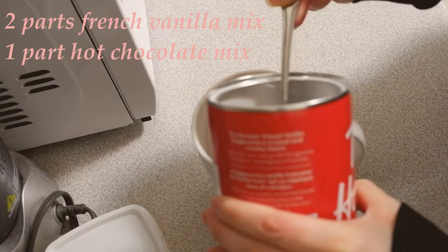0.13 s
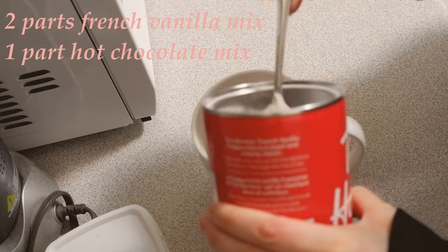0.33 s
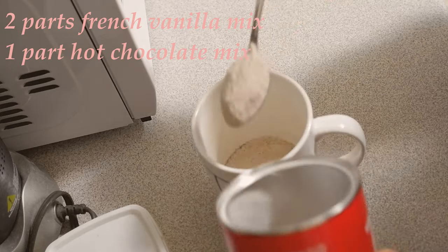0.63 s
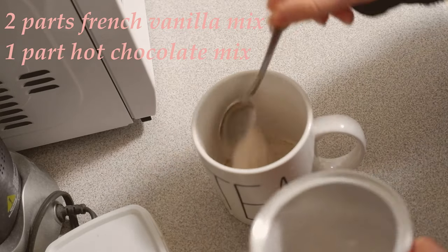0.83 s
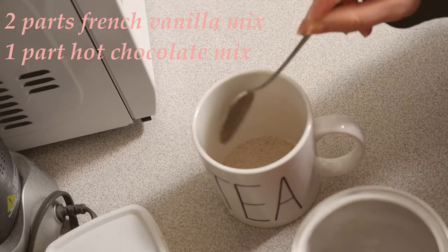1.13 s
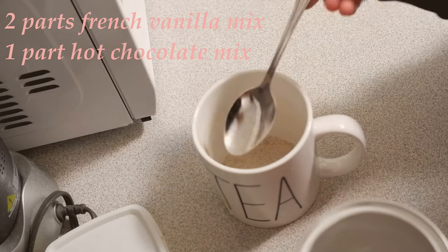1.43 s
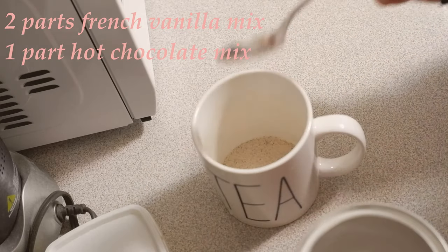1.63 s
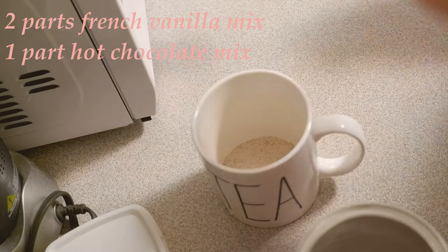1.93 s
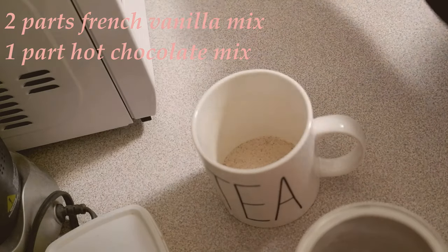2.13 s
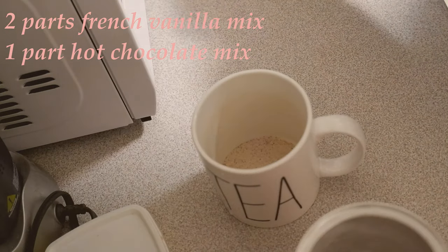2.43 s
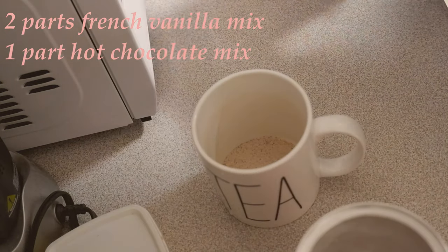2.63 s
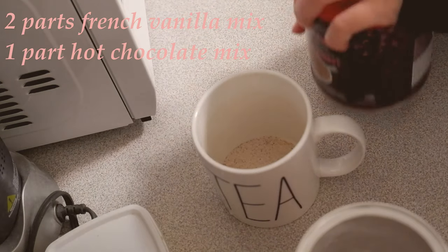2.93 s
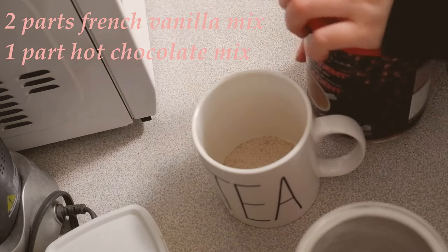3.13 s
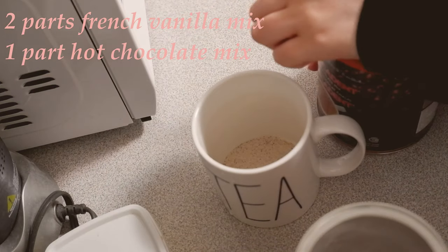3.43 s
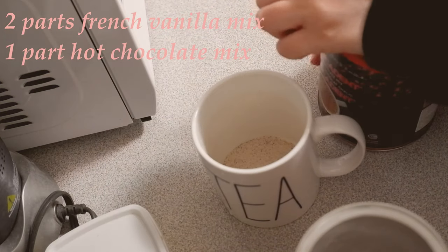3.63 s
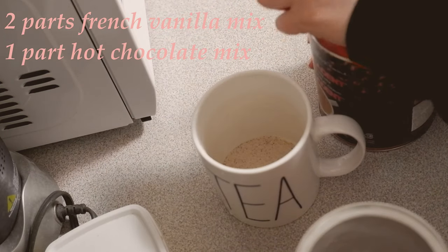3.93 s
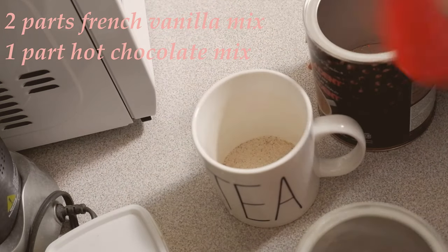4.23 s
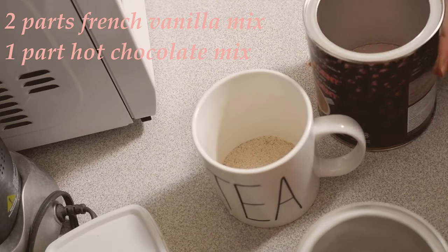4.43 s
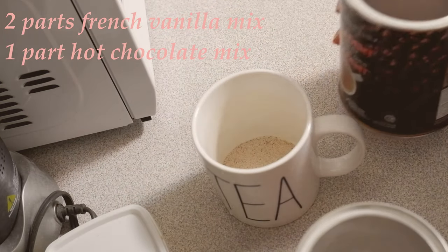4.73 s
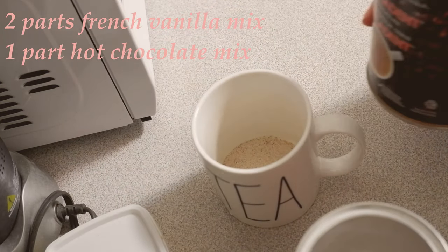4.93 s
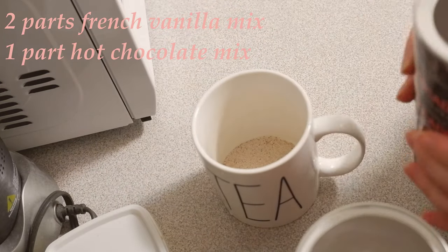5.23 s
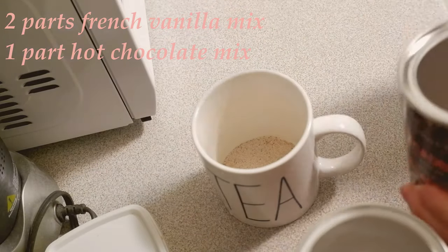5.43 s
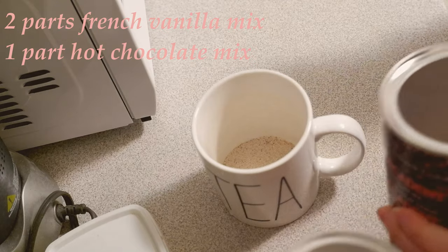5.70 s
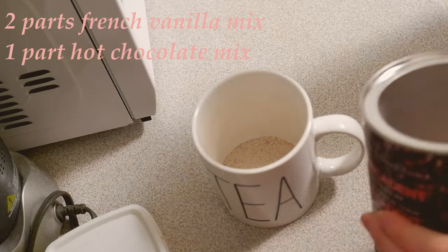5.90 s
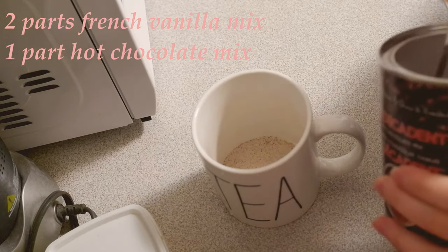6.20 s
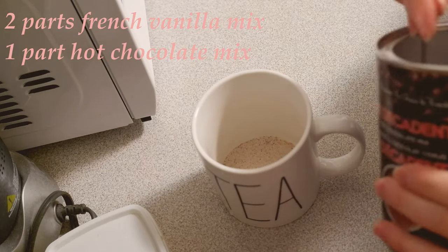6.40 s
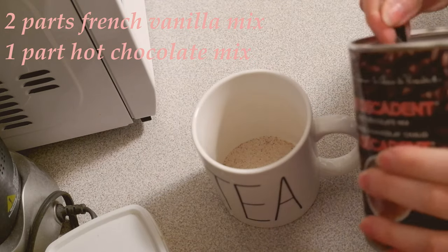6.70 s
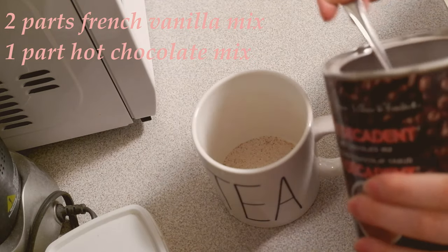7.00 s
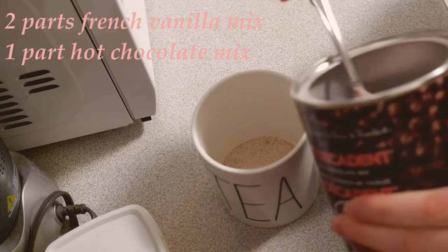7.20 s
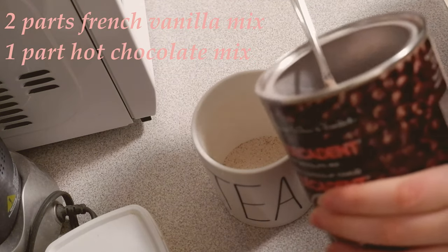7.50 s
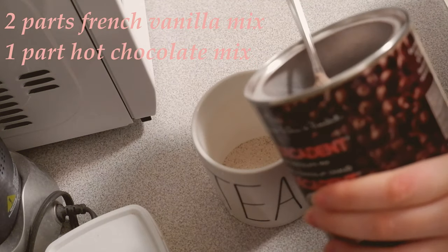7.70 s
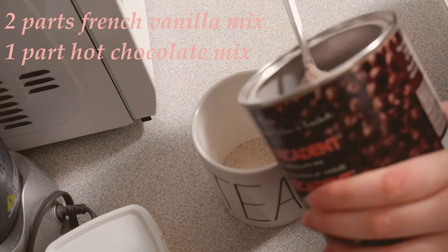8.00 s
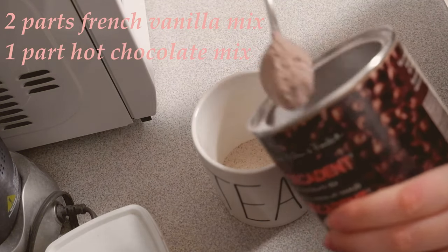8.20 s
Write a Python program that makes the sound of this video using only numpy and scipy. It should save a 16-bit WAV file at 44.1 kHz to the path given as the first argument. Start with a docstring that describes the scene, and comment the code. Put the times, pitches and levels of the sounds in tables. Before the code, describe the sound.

Over a low appliance hum, tins knock onto a kitchen counter, a plastic lid pops off hollowly, then a metal spoon digs crunchily through powder.

```python
"""A metal spoon digs through drink powder in a tin and knocks on its wall, at a kitchen counter.
Before that one tin is set down, and a second is fetched; its lid comes off with a hollow pop and is laid aside.
The tin squeaks and is dragged closer. An appliance hums throughout. Knocks are short bursts that ring a set
of modes, rubbing is a stream of tiny slips, the pop is a rising tone of air, and the hum is tones over noise.
A noise-built room answers every sound on the counter."""
import sys
import numpy as np
from scipy import signal
from scipy.fft import rfft, irfft, next_fast_len
from scipy.io import wavfile
from scipy.ndimage import uniform_filter1d, map_coordinates

SR = 44100
rng = np.random.default_rng(int(sys.argv[2]) if len(sys.argv) > 2 else 0)


def wav_out(sig):
    """Save sig, one row per channel (or a flat mono array), as 16-bit PCM at SR to the path in sys.argv[1]."""
    wavfile.write(sys.argv[1], SR, np.round(np.clip(np.atleast_2d(sig).T, -1, 1) * 32767).astype(np.int16))


N = 368235
TIME = np.arange(N) / SR


def undb(db):
    """Turn decibels into gain."""
    return 10 ** (np.asarray(db) / 20)


def unit(x):
    """Scale to an average (rms) level of 1."""
    return x / np.sqrt(np.mean(x ** 2))


def colour(x, points):
    """Raise or lower each pitch of a sound, following a curve of (pitch_hz, level_db) points."""
    hz, db = np.transpose(points)
    size = next_fast_len(len(x))
    bins_hz = np.maximum(np.arange(size // 2 + 1) * SR / size, 1)
    gain = undb(np.interp(np.log(bins_hz), np.log(hz), db))
    return irfft(rfft(x, size) * gain, size)[:len(x)]


def band(x, low_hz, high_hz):
    """Keep only the pitches between two limits."""
    edges_hz = [low_hz, min(high_hz, .48 * SR)]
    return signal.sosfilt(signal.butter(3, edges_hz, "band", fs=SR, output="sos"), x)


def add(track, s, sound):
    """Mix a sound into a track at time s, in seconds."""
    i = int(s * SR)
    track[i:i + len(sound)] += sound[:N - i]


def fade(t, t60):
    """Die away smoothly, falling 60 dB in t60 seconds."""
    return np.exp(-np.log(1000) * t / t60)


# How far left and right differ. Columns: pitch_hz, side_against_mid_db
STEREO_WIDTH = [(60, -4), (250, -20), (500, -12.5), (1000, -6), (2000, -2.5), (4000, -0.5), (8000, 1.5)]


def spread(mid, side):
    """Make left and right: more alike in the bass, less alike in the treble."""
    side = colour(side, STEREO_WIDTH)
    return np.array([mid + side, mid - side])


# Noise of moving air. Columns: pitch_hz, level_db
RUMBLE_COLOUR = [(20, -11), (40, -8.5), (85, -6), (140, 0), (170, 4), (208, -3), (232, 13), (255, 5),
                 (290, -5.5), (330, -3.5), (370, -8.5), (430, -6), (520, -10.5), (680, -14.5), (800, -20.5),
                 (1030, -16.5), (1600, -27), (2200, -28.5), (3200, -36), (4200, -41.5), (6500, -48.5),
                 (10500, -51), (13000, -61), (15500, -72)]
# Steady tones of motor and mains. Columns: pitch_hz, level_db (rms)
HUM_TONES = [(58.7, -41), (120, -43)]
# Brief drops of the background, before they are smoothed. Columns: start_s, level_db
BACKGROUND_DIPS = [(3.79, -0.5), (4.152, -7), (4.31, -3), (4.61, -9.5)]


def appliance():
    """Motor and mains tones hum under the rumble of moving air; the level dips briefly at the listed moments."""
    mid, side = (unit(colour(rng.standard_normal(N), RUMBLE_COLOUR)) for _ in range(2))
    rumble = undb(-39.5) * spread(mid, side)
    hum = sum(undb(db) * np.sqrt(2) * np.sin(2 * np.pi * (hz * TIME + rng.random()))
              for hz, db in HUM_TONES)
    recovery_s = 0.094
    dips_db = sum(db * (TIME > s) * np.exp(-np.abs(TIME - s) / recovery_s) for s, db in BACKGROUND_DIPS)
    return (hum + rumble) * undb(uniform_filter1d(dips_db, size=SR // 50))


# How long the room rings. Columns: pitch_hz, t60_s (time to fall 60 dB)
ROOM_FADE = [(150, 0.45), (600, 0.25), (2000, 0.32), (6000, 0.22), (14000, 0.55)]


def room_tail(build_s, near_gain, near_t60):
    """Dense early reflections off counter and cupboards, then the room's decay, octave by octave."""
    t = TIME[:SR // 2]
    hz, t60 = np.transpose(ROOM_FADE)
    tail = 0
    for low_hz in 88 * 2. ** np.arange(8):
        noise = band(rng.standard_normal(len(t)), low_hz, 2 * low_hz)
        tail = tail + noise * fade(t, np.interp(low_hz * np.sqrt(2), hz, t60))
    tail = tail * np.minimum(t / build_s, 1) * (1 + near_gain * fade(t, near_t60))
    return tail / np.sqrt(np.sum(tail ** 2))


def kitchen(x, walls, wet_db, pan_db):
    """Direct sound (pan: left minus right), one slap off the wall behind the counter, and the room's answer."""
    slap_s, slap_db = .0066, -14  # the level is against the room's answer
    slap = undb(slap_db + wet_db) * np.interp(TIME - slap_s, TIME, x, left=0)
    direct = (x + slap) * undb(np.array([[pan_db], [-pan_db]]) / 2)
    answer = signal.fftconvolve(x[None], walls, axes=1)[:, :N]
    return direct + undb(wet_db) * answer


def ring(modes, scatter_db, detune):
    """A body rings in close pairs of tones, each pair shifted, split and weighted at random for every blow."""
    t, out = TIME[:SR // 6], 0
    for hz, db, t60 in modes:
        size, shift, split = rng.standard_normal(3)
        pair = sum(np.sin(2 * np.pi * hz * (1 + detune * (shift / 2 + way * split)) * t)
                   for way in (-1, 1)) / 2
        out = out + undb(db + scatter_db * size) * pair * fade(t, t60)
    return out


# Pitch bands in which each blow is balanced. Columns: low_hz, high_hz
BLOW_BANDS = [(70, 300), (300, 700), (700, 1400), (1400, 4500), (4500, 14000)]


def blows(rows, modes, voice, crack_colour, detune, crack_db, crack_t60, gain_db):
    """Each blow pushes, cracks and rings a body; hard contact is brighter, firm contact thumps more."""
    out, t = np.zeros(N), TIME[:SR // 6]
    pivot_hz = 1000  # hardness tilts the sound around this pitch
    octaves = np.log2(np.array(BLOW_BANDS[1:]) / pivot_hz).mean(axis=1)
    voice_hz, voice_db = np.transpose(voice)
    radiated_db = np.interp(octaves, np.log2(voice_hz / pivot_hz), voice_db)
    push = undb(10.5) * fade(t, 0.00068)  # a single pressure pulse
    for s, level_db, hardness, thump_db in rows:
        crack = colour(rng.standard_normal(len(t)), crack_colour) * fade(t, crack_t60)
        hit = ring(modes, scatter_db=2.5, detune=detune) + undb(crack_db) * crack + push
        parts = [band(hit, low, high) for low, high in BLOW_BANDS]
        gains = undb(level_db + np.append(thump_db, radiated_db + hardness * octaves))
        # each band is first evened out over its opening 25 ms
        add(out, s, sum(g * p / np.std(p[:SR // 40]) for g, p in zip(gains, parts)))
    return out * undb(gain_db)


def friction(slips_per_s, scatter_db, hiss, catch_db):
    """Tiny slips of uneven size over the hiss of the smoothest ones; the contact catches and lets go by turns."""
    is_slip = rng.random(N) < slips_per_s / SR
    sizes = undb(scatter_db * np.minimum(rng.exponential(size=N), 4))
    slips = is_slip * rng.choice([-1, 1], N) * sizes
    catch_times = TIME[::SR // 90]
    catches = np.interp(TIME, catch_times, rng.standard_normal(len(catch_times)))
    return (unit(slips) + hiss * rng.standard_normal(N)) * undb(catch_db * np.clip(catches, -2, 2))


def strokes(rows, peak_share, swell):
    """Each stroke presses harder up to a share of its length, then eases off; higher swell is more pointed."""
    out, share = np.zeros(N), np.clip(peak_share, .05, .95)
    for s, length, db in rows:
        progress = TIME[:int(length * SR)] / length
        add(out, s, undb(db) * np.interp(progress, [0, share, 1], [0, 1, 0]) ** swell)
    return out


def pressed(x, modes, damping_hz, floor_db):
    """A body rubbed under pressure: its ringing tones widen into resonances."""
    hz = np.geomspace(100, 16000, 600)
    power = 0
    for mode_hz, db, t60 in modes:
        half_width_hz = damping_hz / 2 + np.log(1000) / (2 * np.pi * t60)
        power = power + undb(db) ** 2 / (1 + ((hz - mode_hz) / half_width_hz) ** 2)
    response_db = 10 * np.log10(power + undb(floor_db) ** 2)
    return unit(colour(x, np.transpose([hz, response_db])))


def wander(x, drift, moves_per_s):
    """The point of contact travels, so the resonances slide a little up and down."""
    knots = np.arange(0, TIME[-1] + 1, 1 / moves_per_s)
    speed = drift * np.interp(TIME, knots, rng.uniform(-0.993, 1, len(knots)))
    return map_coordinates(x, [np.cumsum(1 + speed - speed.mean())], mode="mirror")


# Fingers on the tin. Columns: start_s, length_s, level_db (before a shared trim)
HAND_STROKES = [(0, 0.1, -65), (1.55, 1.75, -66), (1.7, 0.11, -69.5), (2.22, 0.032, -66),
                (2.315, 0.056, -63), (2.41, 0.044, -63), (2.635, 0.068, -68), (2.72, 0.13, -68),
                (3.17, 0.087, -54), (3.29, 0.27, -61), (5.17, 0.16, -54), (5.365, 0.094, -49),
                (5.64, 0.31, -54.5)]
# Sound of skin on the tin. Columns: pitch_hz, level_db
HAND_TONE = [(400, -11), (1500, 9), (3000, 4), (5000, -1.5), (8000, -6.5), (12000, -7), (15000, -11)]


def hand_rub():
    """Fingers brush the tin: uneven slips and hiss, shaped into a soft treble rustle."""
    rub = unit(colour(friction(900, scatter_db=3.0, hiss=0.8, catch_db=4.0), HAND_TONE))
    return rub * strokes(HAND_STROKES, peak_share=0.51, swell=0.37)


# The first tin touching down. Columns: start_s, level_db, hardness_db_per_octave, thump_db;
# levels are before the function's gain
FIRST_TIN_BLOWS = [(1.1465, -18.5, 0, -4), (1.3665, -26, -0.5, -3.5), (1.535, -35.5, -2.5, 1.5),
                   (1.551, -37.5, -5.5, 10)]
# Tones the first tin rings with. Columns: pitch_hz, level_db, t60_s
FIRST_TIN_RING = [(101, 4, 0.035), (246, -1.5, 0.058), (400, -8.5, 0.14), (520, -1, 0.025), (641, 5, 0.026),
                  (770, -3.5, 0.027), (931, -6.5, 0.03), (1062, -5.5, 0.039), (1300, -7.5, 0.027),
                  (1390, -8.5, 0.027), (1700, -10, 0.03), (1965, -8.5, .035), (2280, -15, 0.035),
                  (3800, -16, .022)]
# How the first tin sends out a middling blow. Columns: pitch_hz, level_db
FIRST_TIN_OUTPUT = [(460, 2.5), (1000, -0.5), (2500, -16), (7900, -39.5)]
# Crack of contact, for both tins. Columns: pitch_hz, level_db
TIN_CONTACT = [(500, 7), (1400, 5), (1750, -2), (2400, -1), (3000, -10), (4000, -11), (5500, -19),
               (9000, -21), (14000, -31)]


def first_tin_knocks():
    """The first tin knocks as it is set down: contact cracks make its body ring."""
    return blows(FIRST_TIN_BLOWS, FIRST_TIN_RING, FIRST_TIN_OUTPUT, TIN_CONTACT,
                 detune=.022, crack_db=11, crack_t60=0.018, gain_db=-5.5)


# Knocks of the second tin. Columns: start_s, level_db, hardness_db_per_octave, thump_db;
# levels are before the function's gain
SECOND_TIN_BLOWS = [(2.867, -48, 3, -13), (2.896, -44, 1, -13), (3.541, -18.5, 2.5, -25),
                    (3.5443, -18, -1, -7), (5.659, -43, -7, 6), (5.797, -40, -4, 5), (5.831, -33.5, 1, -1),
                    (5.852, -28, 0, -3), (5.882, -34.5, -1, -3), (5.897, -40.5, -4, 5),
                    (7.779, -47, -5, 11), (8.131, -47, 1, 1), (8.269, -48, -5.5, 12)]
# Tones the second tin rings with. Columns: pitch_hz, level_db, t60_s
SECOND_TIN_RING = [(102, 5, 0.035), (250, -1, 0.057), (402, -10, 0.14), (566, 2.5, 0.028), (670, 2, 0.024),
                   (782, 5, 0.03), (900, -2, 0.03), (1054, -2, 0.035), (1260, -2, 0.03), (1350, 2, 0.026),
                   (1650, -9, .025), (2250, -7, .03), (2520, -11, 0.03), (3080, -16, .022)]
# How the second tin sends out a middling blow. Columns: pitch_hz, level_db
SECOND_TIN_OUTPUT = [(460, 0.5), (1000, 0.5), (2500, -13.5), (7900, -39.5)]


def second_tin_knocks():
    """The second tin knocks when it is moved: contact cracks make its body ring."""
    return blows(SECOND_TIN_BLOWS, SECOND_TIN_RING, SECOND_TIN_OUTPUT, TIN_CONTACT,
                 detune=.022, crack_db=9.5, crack_t60=0.018, gain_db=-5.5)


# Tin sliding. Columns: start_s, length_s, level_db (before a shared trim)
TIN_STROKES = [(.22, 0.11, -47), (.38, 0.093, -42.5), (1.51, 0.038, -37.5), (2.32, 0.084, -43.5),
               (2.405, 0.11, -40.5), (2.437, .06, -34.5), (5.585, 0.12, -37), (5.675, 0.15, -33.5),
               (5.78, 0.15, -32), (5.922, 0.042, -35)]
# Sound of the sliding tin. Columns: pitch_hz, level_db
TIN_DRAG_TONE = [(40, -11), (95, 5), (200, 2), (400, -2), (650, 2.5), (850, -4), (1200, -8), (1600, -9.5),
                 (2200, -14.5), (3000, -22), (5000, -35), (9000, -52), (14000, -54)]


def tin_drag():
    """A tin slides: sparse slips and hiss, shaped into a low rub."""
    drag = unit(colour(friction(600, scatter_db=1.5, hiss=0.48, catch_db=3.0), TIN_DRAG_TONE))
    return drag * strokes(TIN_STROKES, peak_share=0.57, swell=0.62)


# The tin's base skidding on the counter. Columns: start_s, length_s, level_db
SKID_STROKES = [(4.952, .1, -44.5)]
# How fast the base sticks and slips. Columns: time_s, pitch_hz
SKID_SLIP_RATE = [(4.96, 562), (5.0, 550), (5.04, 538), (5.08, 516)]
# Tones of the tin's rim. Columns: pitch_hz, level_db, t60_s
SKID_RING = [(610, 1, 0.07), (1070, 4.5, 0.06), (1620, -5, .04), (2190, 5.5, 0.07), (3310, -6, 0.05)]


def tin_skid(rough, hiss):
    """The tin's base sticks and slips in a short, rough squeak that sags as the tin lifts."""
    jitter = unit(uniform_filter1d(rng.standard_normal(N), size=SR // 400))
    slip_hz = np.interp(TIME, *np.transpose(SKID_SLIP_RATE)) * (1 + rough * jitter)
    phase = 2 * np.pi * np.cumsum(slip_hz) / SR
    squeak = unit(sum(np.cos(k * phase) for k in range(1, 7)))
    rub = squeak + hiss * friction(1500, scatter_db=-1.0, hiss=.6, catch_db=3.0)
    body = pressed(rub, SKID_RING, damping_hz=90, floor_db=-45)
    return body * strokes(SKID_STROKES, peak_share=0.33, swell=0.65)


# Lid sliding. Columns: start_s, length_s, level_db (before a shared trim)
LID_STROKES = [(3.9, 0.23, -55.5), (3.957, 0.029, -44), (4.12, 0.28, -58), (4.285, 0.034, -43.5),
               (4.88, .18, -51.5)]
# Sound of the sliding lid. Columns: pitch_hz, level_db
LID_TONE = [(300, -7), (600, 3), (1000, 0), (1700, 4), (2400, 0.5), (3500, -8.5), (5000, -17),
            (9000, -26.5), (14000, -32)]


def lid_slide():
    """The plastic lid slides: dense slips and hiss, brighter than the tin."""
    slide = unit(colour(friction(2000, scatter_db=1.0, hiss=1.0, catch_db=4.0), LID_TONE))
    return slide * strokes(LID_STROKES, peak_share=0.58, swell=0.47)


# Snaps and knocks of the lid, and from 5.17 s faint ticks of fingers.
# Columns: start_s, level_db, hardness_db_per_octave, thump_db; levels are before the function's gain
LID_AND_FINGER_BLOWS = [(2.326, -52, 0.5, -8), (2.913, -54, 2, -1), (3.095, -52, 1, -8),
                        (3.745, -42, -9.5, 5), (3.781, -25.5, -5.5, 0), (3.784, -24.5, -3, 3),
                        (3.96, -38, -1, -22), (4.059, -47, -9.5, 13.5), (4.1425, -48.5, 5.5, -6),
                        (4.22, -52, -4, 8), (4.303, -48, 2.5, -10), (4.5935, -24.5, -1.4, -15),
                        (4.621, -32.5, -1, -5), (4.637, -41.5, -2.5, -14), (4.657, -44.5, -1.5, -14),
                        (4.767, -48, 3, -6), (4.8115, -36, -3, -22), (4.822, -40, -5, -12),
                        (5.173, -60, 6, -6), (5.272, -66, 8, -3), (5.369, -63, 9, -3)]
# Tones the lid rings with. Columns: pitch_hz, level_db, t60_s
LID_RING = [(200, 2, 0.04), (402, -1, 0.066), (594, 5, 0.045), (773, 2, 0.026), (960, -2, 0.034),
            (1100, 1.5, 0.035), (1270, 4, 0.027), (1565, 3.5, 0.032), (1950, 5.5, 0.026),
            (2157, 6.5, 0.026), (2420, -2.5, 0.021), (2830, -6.5, 0.026), (3170, -6, 0.016),
            (4250, -18, .018)]
# How the lid sends out a middling blow. Columns: pitch_hz, level_db
LID_OUTPUT = [(460, -4.5), (1000, -0.5), (2500, 2.5), (7900, -18)]
# Crack of contact with the lid. Columns: pitch_hz, level_db
LID_CONTACT = [(500, 8.5), (2300, 4), (3200, -9), (4800, -16), (7000, -16), (9000, -21.5), (14000, -25)]


def lid_snaps_and_finger_ticks():
    """The plastic lid snaps and knocks with a crack and a brief ring; faint finger ticks share its tones."""
    return blows(LID_AND_FINGER_BLOWS, LID_RING, LID_OUTPUT, LID_CONTACT,
                 detune=.022, crack_db=12, crack_t60=0.027, gain_db=-5.5)


# Echoes of the pop from nearby things. Columns: delay_s, level_db (against the pop)
POP_REFLECTIONS = [(.018, -12.5), (0.037, -15), (.051, -19), (.08, -28)]
# Air forced past the lid's rim. Columns: pitch_hz, level_db
PUFF_TONE = [(1000, -2), (4000, -3), (8000, -4), (11500, 3), (15000, -1)]


def lid_pop(swell_s, hold_s, t60, glide, opening_s, puff_db):
    """Air in the tin booms and hisses past the rim as the lid lifts; its pitch rises as the mouth opens."""
    out, t = np.zeros(N), TIME[:SR // 8]
    pop_s, open_hz = 4.1385, 469  # open_hz is the pitch the glide arrives at
    hz = open_hz * (1 - glide * np.exp(-t / opening_s))
    tone = np.sin(2 * np.pi * np.cumsum(hz) / SR)
    puff = undb(puff_db) * unit(colour(rng.standard_normal(len(t)), PUFF_TONE))
    pop = (tone + puff) * np.minimum(t / swell_s, 1) * fade(np.maximum(t - hold_s, 0), t60)
    add(out, pop_s, pop)
    for delay, db in POP_REFLECTIONS:
        add(out, pop_s + delay, undb(db) * pop)
    return out * undb(-6.5)


# Spoon knocks. Columns: start_s, level_db, hardness_db_per_octave, thump_db;
# levels are before the function's gain
SPOON_BLOWS = [(1.796, -55, -1, -2), (6.4245, -36, -1.5, 2), (6.466, -49.5, -2.5, -5), (6.542, -51, 1, 1),
               (6.6035, -54, 1, -8), (6.639, -52, 0.5, -8), (6.6585, -39, 2.2, -12), (6.687, -38, 1.3, -11),
               (6.754, -41.5, 2.5, -12), (6.857, -60, 1.5, -5), (6.897, -48.5, 4, 2),
               (7.0738, -29.5, -0.8, -13), (7.163, -56.5, 5.5, -10), (7.206, -52, 1.5, -6),
               (7.224, -51, 2.5, -8), (7.2695, -43.5, 0, -5), (7.874, -48.5, 0, 5)]
# Tones heard when the spoon knocks or scrapes. Columns: pitch_hz, level_db, t60_s
SPOON_RING = [(602, 6.5, 0.043), (1274, 3, 0.058), (1430, 3, 0.052), (1650, -4, 0.027), (1953, 1.5, 0.048),
              (2420, 2, 0.031), (2840, -1.5, 0.066), (3270, -4.5, 0.053), (4010, -5.5, 0.035),
              (4260, -6.5, 0.052), (5080, -13, .05), (5850, -8, 0.04), (5990, -12, 0.037),
              (6620, -15, 0.05), (7100, -16, 0.025), (7700, -17, 0.02), (8360, -20, 0.02)]
# How the spoon sends out a middling blow. Columns: pitch_hz, level_db
SPOON_OUTPUT = [(460, 3.5), (1000, -1.5), (2500, 0.5), (7900, -9)]
# Crack of contact with the spoon. Columns: pitch_hz, level_db
SPOON_CONTACT = [(400, -10), (600, 4), (780, -20), (1000, -8), (1300, 3), (2000, 4), (2900, 2),
                 (3600, -7.5), (4300, -4), (5400, -17), (6000, -14), (9000, -17), (14000, -26)]


def spoon_knocks():
    """The metal spoon knocks on the tin's wall: bright cracks with a ring whose pitches vary little."""
    return blows(SPOON_BLOWS, SPOON_RING, SPOON_OUTPUT, SPOON_CONTACT,
                 detune=.022 / 4, crack_db=17.5, crack_t60=0.029, gain_db=-6.0)


# Spoon scraping the wall. Columns: start_s, length_s, level_db (before a shared trim)
SCRAPE_STROKES = [(6.53, 0.31, -53), (7.075, 0.12, -39.5), (7.16, 0.15, -44.5), (7.46, 0.45, -57.5),
                  (7.607, 0.047, -52.5), (7.677, 0.044, -51.5), (7.81, 0.027, -54), (7.935, 0.03, -52.5)]
# Metal slipping on metal. Columns: pitch_hz, level_db
SCRAPE_TONE = [(600, -4), (1100, -15), (1450, -0.5), (2800, -3.5), (4250, 0), (5100, 2), (6500, 9),
               (9000, 5), (14000, -1)]
# Treble lost when the spoon barely presses. Columns: pitch_hz, level_db
LIGHT_TOUCH_TONE = [(4400, 2.5), (6000, -18), (7500, -32)]


def spoon_scrape():
    """Metal slips on metal as the spoon scrapes the wall, brighter the harder it presses."""
    slips = colour(friction(1200, scatter_db=2.0, hiss=0.31, catch_db=3.0), SCRAPE_TONE)
    bright = wander(pressed(slips, SPOON_RING, damping_hz=30, floor_db=-29), drift=0.011, moves_per_s=18)
    dull = colour(bright, LIGHT_TOUCH_TONE)
    pressure = strokes(SCRAPE_STROKES, peak_share=0.25, swell=0.89)
    return (dull + (bright - dull) * pressure / pressure.max()) * pressure


# Spoon lifting along the wall. Columns: start_s, length_s, level_db (before a shared trim)
SQUEAK_STROKES = [(6.97, 0.065, -52)]
# Spoon and tin while the bowl is buried in powder. Columns: pitch_hz, level_db, t60_s
BURIED_RING = [(573, 3, .04), (1214, 2.5, .06), (1820, -11, .08), (2040, -1.5, .08), (2330, -6, .04),
               (2810, -4.5, .1), (3130, -10, .05), (3680, -7, 0.091), (4300, -13, .05), (5420, -14, .04),
               (6480, -17, .04)]


def spoon_squeak():
    """The spoon squeaks as it lifts along the wall: noise passes through narrow resonances."""
    noise = band(rng.standard_normal(N), 1900, 4100)
    squeak = pressed(noise, BURIED_RING, damping_hz=4, floor_db=-33)
    return squeak * strokes(SQUEAK_STROKES, peak_share=.45, swell=.8)


# Spoon digging in powder. Columns: start_s, length_s, level_db (before a shared trim)
DIG_STROKES = [(6.42, 0.11, -52.5), (6.52, 0.082, -44), (6.6, 0.19, -46.5), (6.715, 0.1, -43.5),
               (6.81, 0.19, -47), (7.08, 0.29, -56), (7.37, 0.48, -65)]
# How the powder dulls the sound. Columns: pitch_hz, level_db
POWDER_TONE = [(300, -9), (570, 0), (850, -5), (1200, -0.5), (9500, 0.5), (13000, -7), (15500, -16)]


def powder_dig():
    """The spoon crunches through fine powder and coarse grains, whose slips shake spoon and tin."""
    grit = unit(friction(130, scatter_db=2.0, hiss=0, catch_db=1.0))
    crunch = friction(1100, scatter_db=1.0, hiss=0.4, catch_db=3.0) + undb(-2) * grit
    powder = wander(pressed(crunch, BURIED_RING, damping_hz=75, floor_db=-23.5), drift=.06, moves_per_s=12)
    powder = unit(colour(powder, POWDER_TONE))
    return powder * strokes(DIG_STROKES, peak_share=0.29, swell=0.45)


def scene():
    """Everything but the hum happens on the counter, a little right of centre."""
    mid = room_tail(build_s=0.0062, near_gain=1.53, near_t60=0.094)
    side = undb(3.0) * room_tail(build_s=0.00057, near_gain=5.4, near_t60=0.023)
    walls = spread(mid, side)
    handling = undb(-1.32) * (hand_rub() + tin_drag() + lid_slide()) + tin_skid(rough=.032, hiss=2.2)
    pop = lid_pop(swell_s=0.002, hold_s=0.014, t60=0.018, glide=0.3, opening_s=0.0043, puff_db=-40.0)
    scooping = undb(-2.0) * (spoon_scrape() + spoon_squeak() + powder_dig())
    out = appliance()
    out = out + kitchen(handling, walls, wet_db=-2.5, pan_db=-1.0)
    out = out + kitchen(first_tin_knocks(), walls, wet_db=-2.0, pan_db=-1.4)
    out = out + kitchen(second_tin_knocks(), walls, wet_db=-3.5, pan_db=-1.5)
    out = out + kitchen(lid_snaps_and_finger_ticks(), walls, wet_db=-4.0, pan_db=-1.0)
    out = out + kitchen(pop, walls, wet_db=-17, pan_db=-0.5)
    out = out + kitchen(spoon_knocks(), walls, wet_db=-3.5, pan_db=-1.5)
    out = out + kitchen(scooping, walls, wet_db=-4.0, pan_db=-2.0)
    lean_db = -1.5  # left minus right, for the whole mix
    return out * undb(np.array([[lean_db], [-lean_db]]) / 2)


def record(dry):
    """The microphone loses the deepest bass and the very top."""
    x = signal.sosfilt(signal.butter(2, 22, "high", fs=SR, output="sos"), dry)
    x = signal.sosfilt(signal.butter(3, 13000, fs=SR, output="sos"), x)
    return signal.sosfilt(signal.ellip(8, .2, 70, 15600, fs=SR, output="sos"), x)


dry = scene()
out = record(dry)
wav_out(out)
```